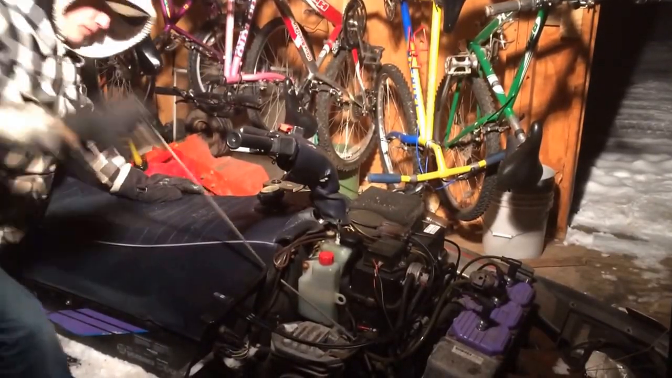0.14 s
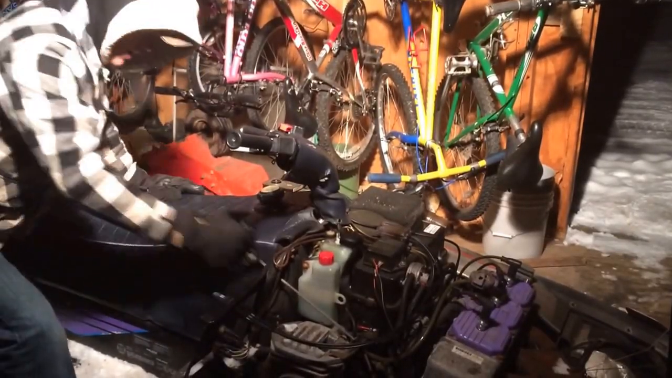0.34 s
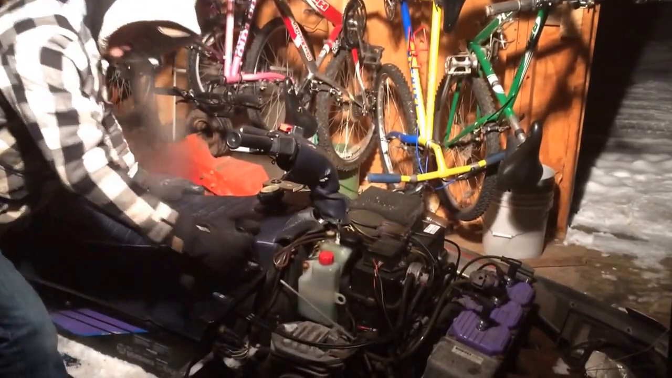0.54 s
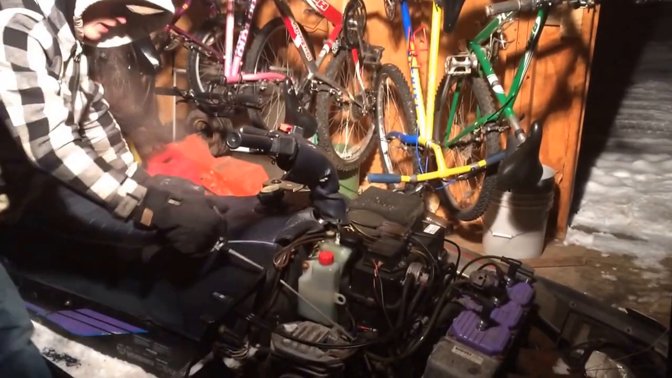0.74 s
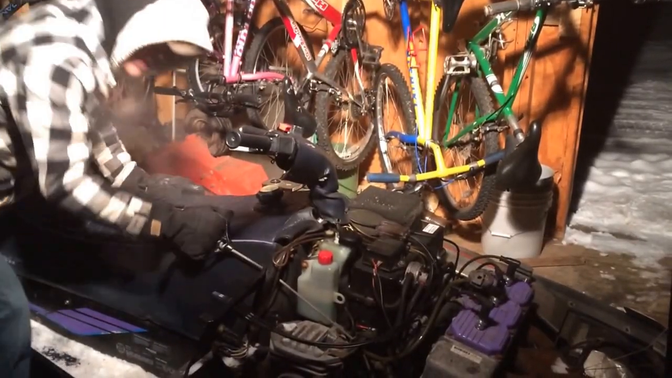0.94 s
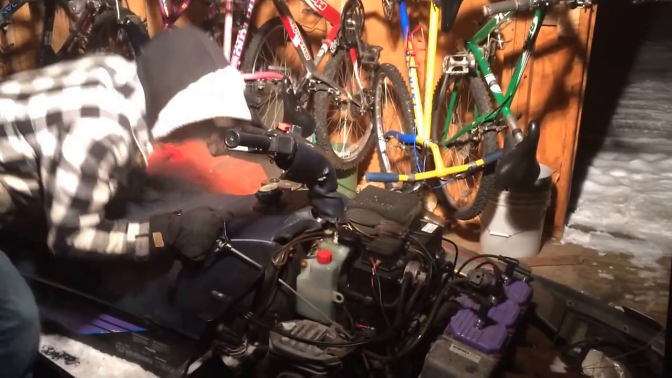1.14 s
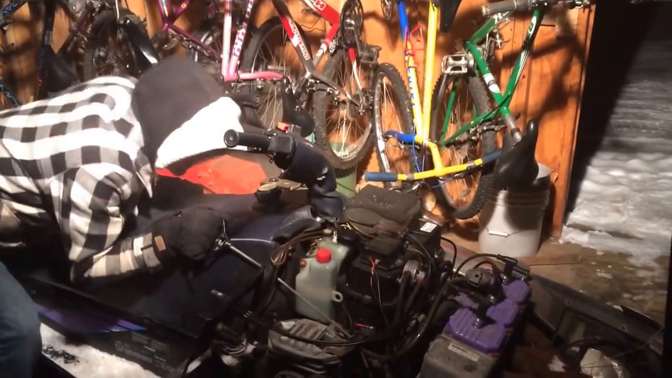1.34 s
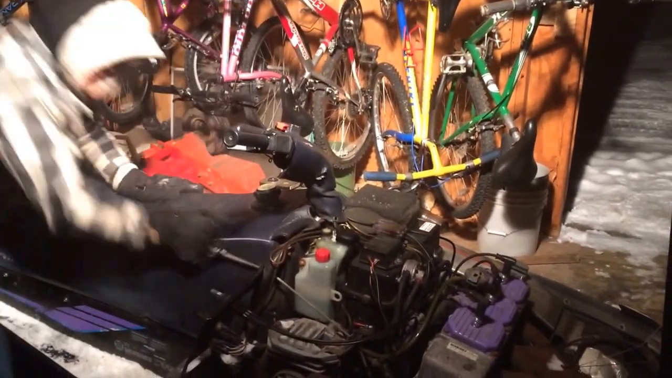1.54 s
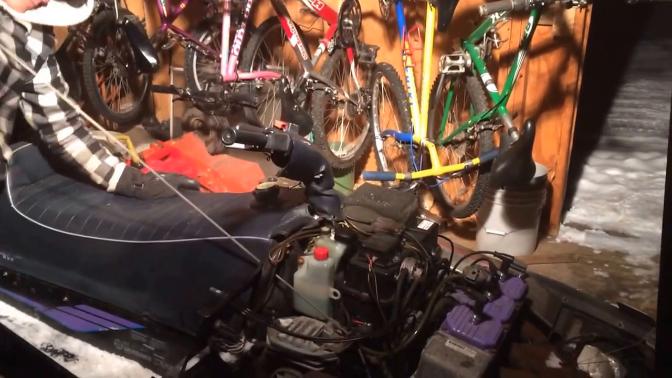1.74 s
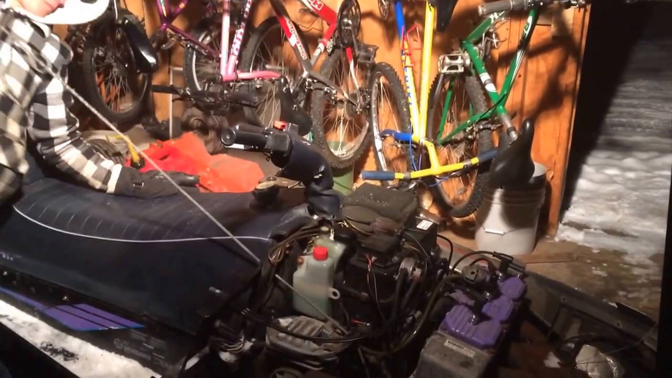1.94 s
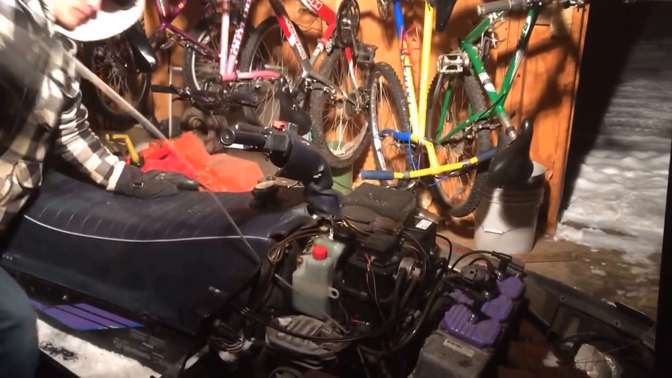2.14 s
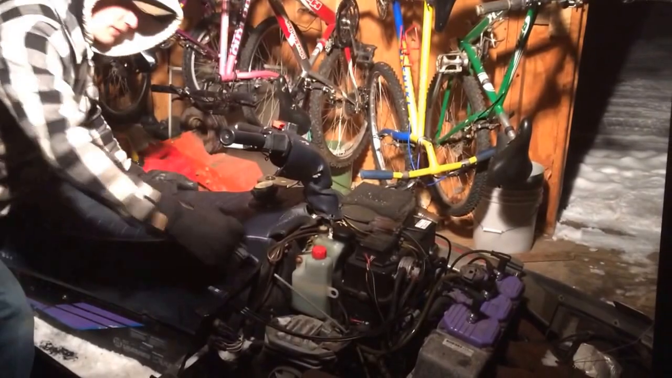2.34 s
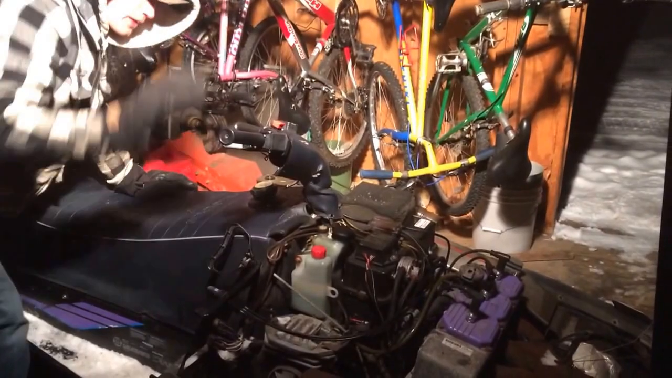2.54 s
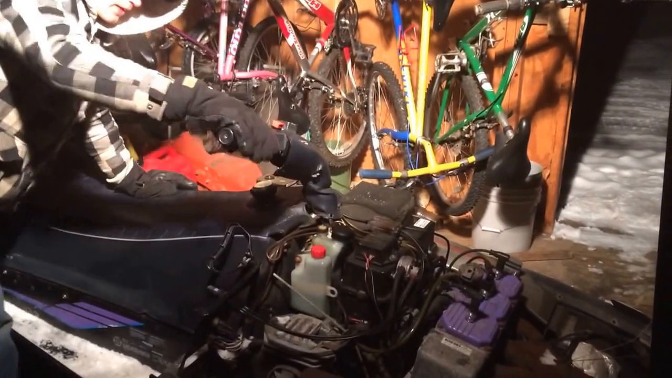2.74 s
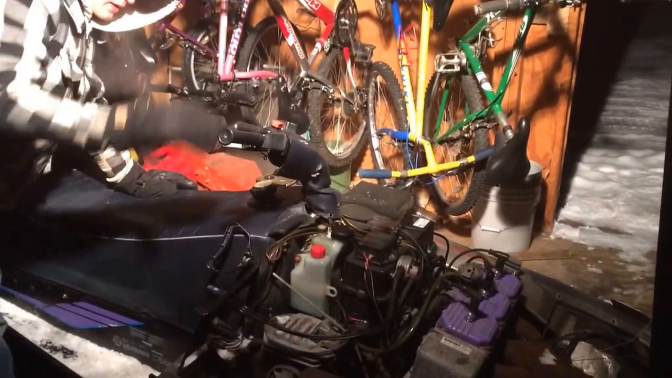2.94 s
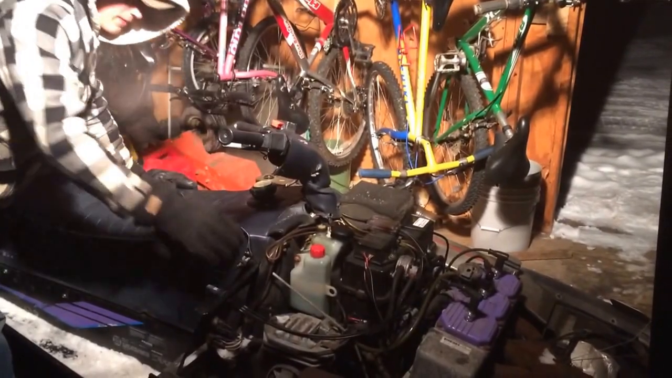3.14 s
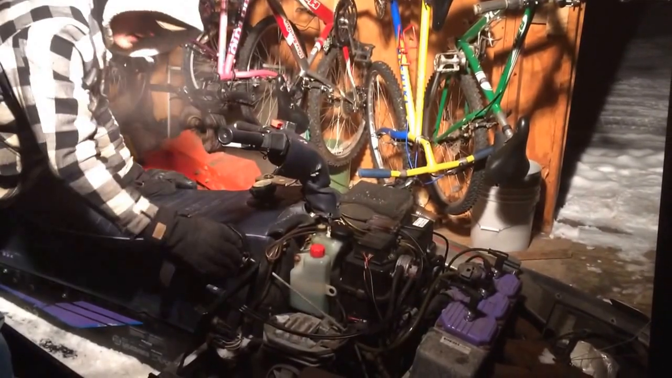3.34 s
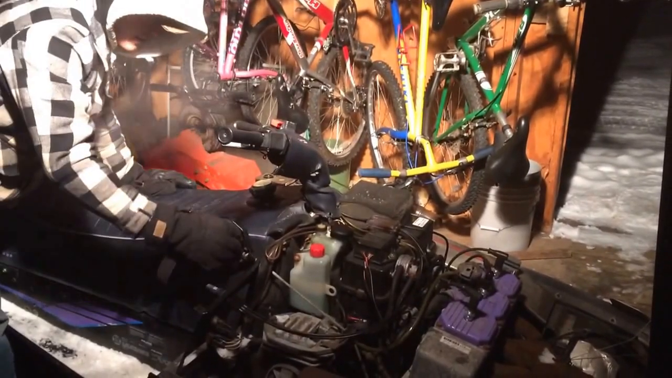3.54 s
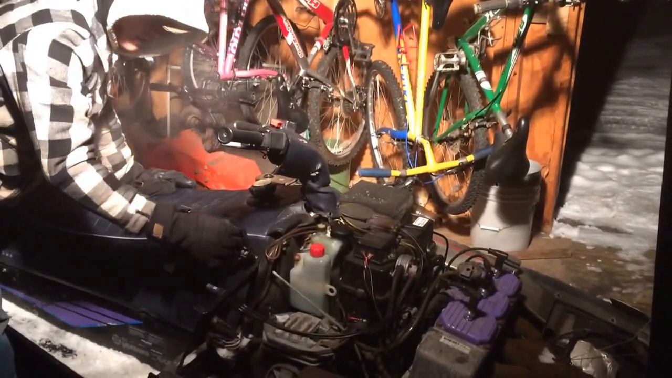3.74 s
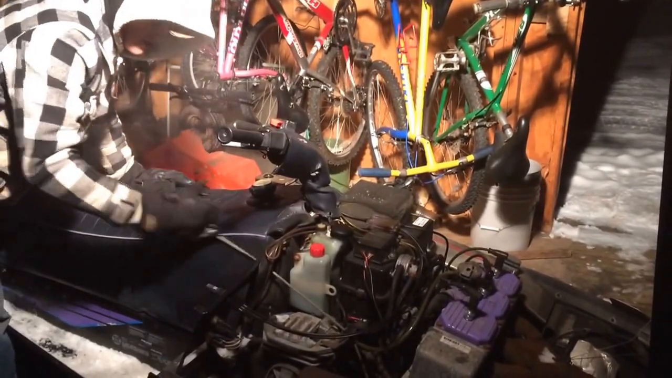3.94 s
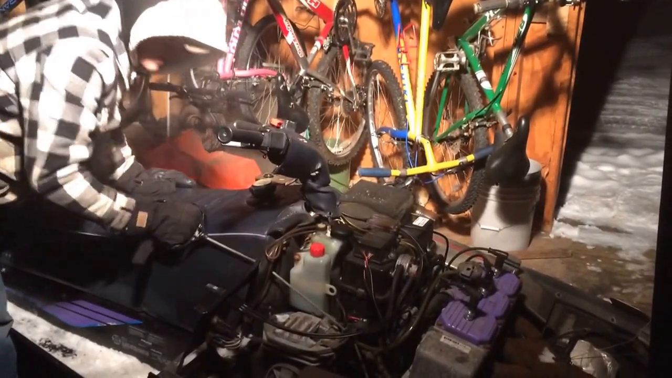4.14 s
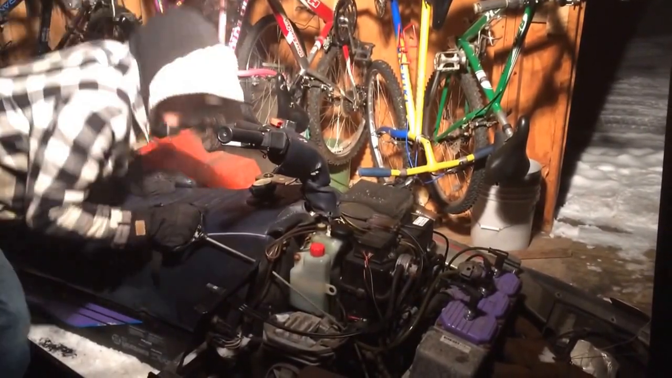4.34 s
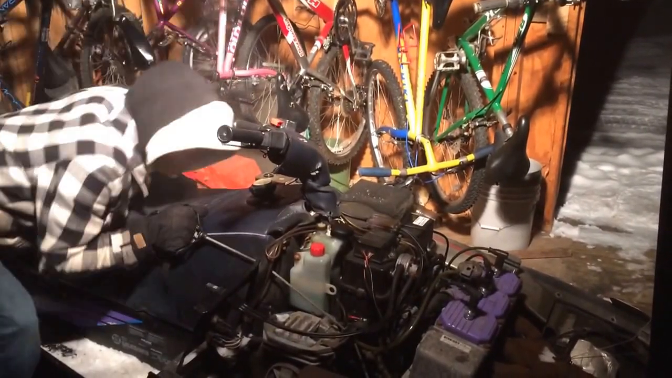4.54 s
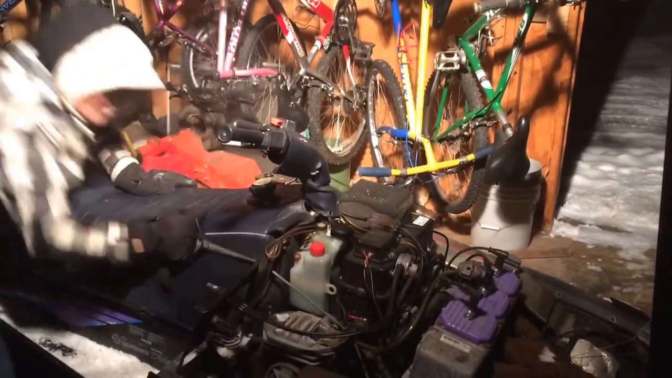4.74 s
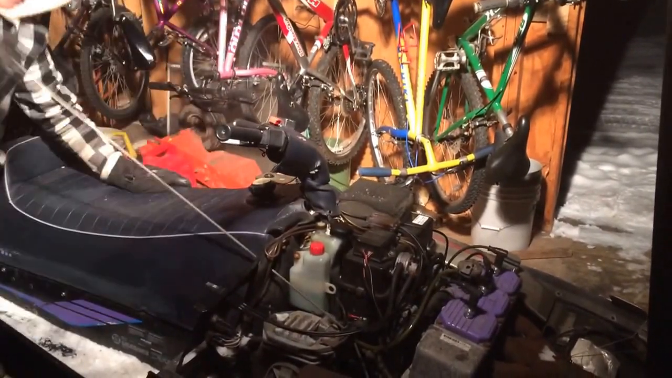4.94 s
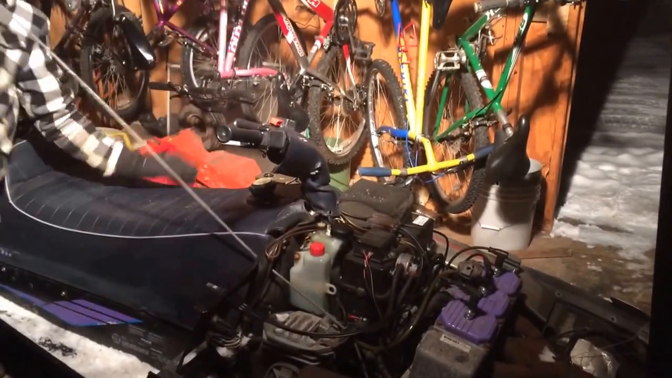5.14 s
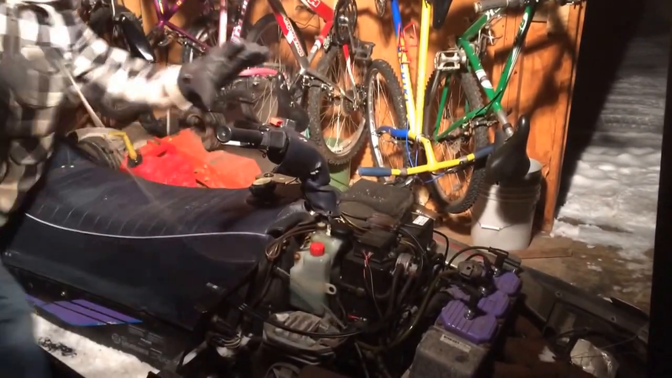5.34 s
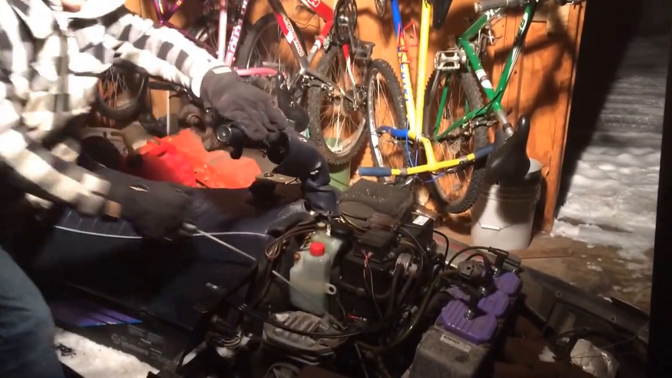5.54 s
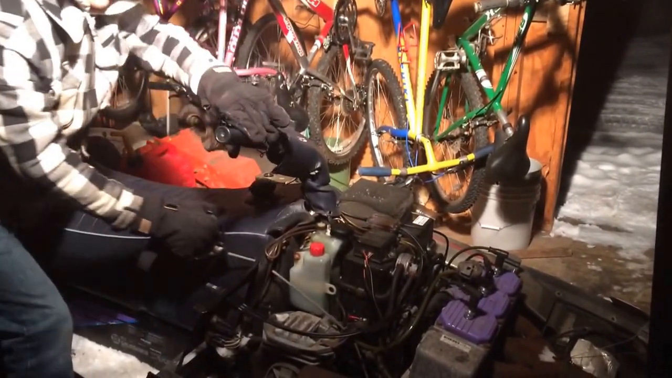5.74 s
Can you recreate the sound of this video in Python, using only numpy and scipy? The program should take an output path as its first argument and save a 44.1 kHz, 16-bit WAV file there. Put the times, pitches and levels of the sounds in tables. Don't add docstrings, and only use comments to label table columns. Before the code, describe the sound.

A two-stroke snowmobile is pull-started in a small wooden shed, heard close up with loud peaks slightly squashed. From 0 to 0.5 s a previous pull fades in weak puffs, rattling and dull knocks. At 0.65 s the handle hits the cowl hard, with a hollow bonk and thin steel ring; quiet handling and soft bumps follow. A cord scrape swells from 1.4 s, and from 1.6 to 2.3 s the engine coughs in low, uneven booms amid chattering panels, cowl hum, hiss, tiny squeaks and a pawl clink at 1.92 s. It wheezes out by 2.65 s. Boots and chassis thud around 2.8 s, then near quiet with small clicks and rustles. Handle clacks come at 3.9 and 4.0 s, with a pause and rising cord rub. A sharp knock at 4.78 s starts the last pull; irregular exhaust puffs and metallic clatter continue from 4.85 s, with a brief sag near 5.3 s, to the end.

```python
import sys
import numpy as np
from scipy import signal
from scipy.fft import rfft, irfft, next_fast_len
from scipy.io import wavfile
from scipy.ndimage import map_coordinates

SR = 44100
rng = np.random.default_rng(int(sys.argv[2]) if len(sys.argv) > 2 else 0)


def attenuation_scalar(level_db):
    decades = np.asarray(level_db, float) / 20
    return 10 ** decades


def master(y):
    cut = np.clip(np.atleast_2d(y).T, -1, 1)
    pcm = np.round(cut * 32767)
    wavfile.write(sys.argv[1], SR, pcm.astype(np.int16))


N = 255339
TIME = np.arange(N) / SR


def unit(x):
    return x / np.sqrt(np.mean(x ** 2))


def colour(x, spectrum):
    hz, db = np.transpose(spectrum)
    size = next_fast_len(len(x))
    f = np.arange(1, size // 2 + 2) * SR / size
    gain = attenuation_scalar(np.interp(np.log(f), np.log(hz), db, -70, -70))
    return unit(irfft(rfft(x, size) * gain, size)[:len(x)])


def ring(x, hz, t60):
    r = 1000 ** (-1 / (t60 * SR))
    w = 2 * np.pi * hz / SR
    return signal.lfilter([0, np.sin(w)], [1, -2 * r * np.cos(w), r * r], x)


def band(x, hz, width):
    edges = [max(hz - width / 2, 20), min(hz + width / 2, .45 * SR)]
    return signal.sosfilt(signal.butter(2, edges, "bandpass", fs=SR, output="sos"), x)


def walk(rate):
    low_pass = signal.butter(2, rate / 2, fs=SR, output="sos")
    return unit(signal.sosfilt(low_pass, rng.standard_normal(N)))


def grit(spread_db):
    sizes_db = spread_db * np.repeat(rng.exponential(size=N // 48 + 1), 48)[:N]
    return rng.standard_normal(N) * attenuation_scalar(np.minimum(sizes_db, 3.5 * spread_db))


def add(out, s, sound):
    i = int(s * SR)
    sound = sound[max(-i, 0):N - i]
    out[max(i, 0):max(i, 0) + len(sound)] += sound


def curve(rows, lag=0, quiet_db=-99):
    s, db = np.transpose(rows)
    return np.interp(TIME - lag, s, db, quiet_db if s[0] > .05 else db[0], quiet_db)


def boom(peak_s, db, hz, length):
    rise = 2 * length
    t = np.arange(int(8 * length * SR)) / SR / rise
    swell = attenuation_scalar(db) * (t * np.exp(1 - t)) ** 4
    return peak_s - rise, swell, -swell * np.cos(2 * np.pi * hz * rise * (t - 1))


# peak in seconds, peak level in dB, boom pitch in Hz.
COUGHS = [(0.0277, -29.9, 83.0), (0.0528, -34.8, 72.6), (0.105, -31, 83.0), (1.617, -18, 71.4),
          (1.632, -21, 106), (1.6572, -10.3, 71.4), (1.685, -17, 88), (1.703, -16, 118),
          (1.7197, -9.5, 71.5), (1.7486, -10, 68.0), (1.7668, -9.5, 99), (1.7935, -18, 68.0),
          (1.8187, -20, 121), (1.8401, -14.5, 107), (1.861, -3, 82.5), (1.8785, -14, 100),
          (1.8995, -7.5, 77.0), (1.9168, -29, 104.0), (1.9457, -9, 92.5), (1.9608, -18, 125),
          (1.9813, -23, 89.0), (2.0035, -4, 80.0), (2.02, -12, 110.0), (2.0436, -8, 77.0),
          (2.0662, -16, 98.0), (2.0959, -28, 89.0), (2.12, -11.5, 77.0), (2.1344, -24, 122.0),
          (2.1693, -23, 122.0), (2.1904, -17.5, 92.0), (2.2126, -10, 80.5), (2.2392, -11, 77.0),
          (2.277, -10.1, 85), (2.2955, -20, 119), (2.3262, -13, 82.5), (2.344, -25, 115), (2.3718, -19, 78),
          (2.427, -21.5, 77), (2.4845, -23.5, 81.4)]
# peak in seconds, peak level in dB, boom pitch in Hz.
PUFFS = [(4.852, -20, 77.0), (4.8676, -24, 116.0), (4.889, -13.5, 71.0), (4.9109, -21, 113.0),
         (4.9304, -16.5, 77.0), (4.955, -9.5, 99.6), (4.9714, -8, 83), (5.007, -22, 77.0), (5.0306, -5, 84),
         (5.047, -11, 101.0), (5.0685, -6, 77.0), (5.0951, -7, 77.0), (5.1115, -27, 122.0),
         (5.1355, -14.5, 86.0), (5.153, -23, 80.0), (5.171, -13, 84.5), (5.207, -27, 97),
         (5.2276, -2.5, 83), (5.2545, -5, 89), (5.344, -25, 71.0), (5.3853, -21, 71.6), (5.415, -26, 113.0),
         (5.4386, -17.5, 93), (5.46, -7.5, 65.0), (5.4835, -3.5, 81), (5.511, -16.5, 117),
         (5.5325, -14.5, 84), (5.5582, -3.5, 77.0), (5.5809, -12, 93.5), (5.6144, -12.5, 77.0),
         (5.6352, -18, 127), (5.652, -8, 78), (5.689, -10, 77.0), (5.7127, -21, 113.0), (5.7324, -18, 66.6),
         (5.751, -13, 86.0)]
# peak in seconds, peak level in dB,
# boom pitch in Hz.
WHEEZES = [(2.4, -20.5, 86), (2.455, -27, 90), (2.52, -29, 80), (2.556, -26.5, 80), (2.594, -32.5, 80.5),
           (2.625, -36, 80), (5.283, -23, 90), (5.315, -25, 100)]
# pitch in Hz, level in dB, T60 in seconds.
SILENCER = [(77, -18, 0.37), (140, 8.5, 0.14)]


def exhaust():
    pressure, flow, kicks = np.zeros(N), np.zeros(N), np.zeros(N)
    for s, db, hz in COUGHS + PUFFS + WHEEZES:
        start, swell, wave = boom(s, db, hz, length=.011)
        add(pressure, start, wave)
        add(flow, start, swell)
        add(kicks, s - .008, attenuation_scalar(db - 20) * np.hanning(130) / 65)
    shell = band(sum(attenuation_scalar(db) * ring(kicks, hz, t60) for hz, db, t60 in SILENCER), 144, 250)
    gas = attenuation_scalar(-24) * flow * unit(band(rng.standard_normal(N), 178, 104))
    return pressure + shell + gas


# time in seconds, level in dB.
SPINS = [
    [(0, -31.5), (.06, -33), (.16, -34.5), (.31, -42.5), (.45, -42)],
    [(1.57, -58), (1.63, -30), (1.71, -31), (1.8, -31.5), (2.1, -32.5), (2.24, -34), (2.42, -38.5),
     (2.7, -40), (2.85, -48)],
    [(4.72, -57), (4.79, -32.5), (4.89, -31), (4.95, -30.5), (5.11, -33), (5.27, -33), (5.47, -32.5),
     (5.9, -35)],
]
# time in seconds, fumbling in dB, weight leaning on the chassis in dB.
HANDLING = [(.2, -43, -24), (.43, -45, 4.5), (.61, -47.5, -5.5), (.72, -47.5, -0.5), (.82, -38, -3.5),
            (1.0, -48.5, -9.5), (1.12, -63, 2.5), (1.45, -71, 7), (2.3, -70.5, -16.5), (2.67, -39, -9),
            (2.82, -40, 0.5), (3.02, -66.5, -4.5), (3.3, -60, 4), (3.52, -48.5, -7.5), (3.87, -51.5, -7),
            (4.03, -54, 8), (4.24, -58, 3), (4.5, -61, 7.5), (4.701, -62.5, -1)]


def drive(db, slope, lag, hand_db, weight=0):
    spin_db = np.max([curve(pull, lag) for pull in SPINS], axis=0)
    hands_db = curve([(s, fumble_db + weight * lean_db) for s, fumble_db, lean_db in HANDLING])
    usual_spin_db = -33
    crank = attenuation_scalar(usual_spin_db + db + slope * (spin_db - usual_spin_db))
    return np.hypot(crank, attenuation_scalar(hands_db + hand_db))


# pitch in Hz, level in dB, T60 in seconds.
PANELS = [(340, -7.5, 0.25), (917, -8, 0.11), (1032, -4.5, 0.071), (1386, -8, 0.089), (1481, -3.5, 0.15),
          (1715, -6, 0.12), (1835, -5, 0.17), (1984, -11.5, 0.22), (3190, -14.5, 0.03)]
# frequency in Hz, level in dB.
RATTLE = [(400, -27), (600, -24), (1030, 3.5), (1850, 1), (2300, -7), (3190, -4), (3900, -18), (5500, -41)]


def rattle(jolt):
    ticks = grit(5.0)
    panels = sum(attenuation_scalar(db + 3.6 * walk(32.0)) * unit(ring(ticks, hz, t60)) for hz, db, t60 in PANELS)
    drift = np.cumsum(.025 * walk(8))
    panels = map_coordinates(panels, [np.arange(N) + drift], mode="mirror")
    chatter = .8 * colour(grit(3.4), RATTLE) + .7 * unit(panels)
    return chatter * attenuation_scalar(1.6 * jolt) * drive(db=0, slope=1.29, lag=0, hand_db=0) * attenuation_scalar(2.5)


# time in seconds, level in dB.
SLAPS = [
    (0.648, -13),
    (3.893, -21.5),
    (3.988, -17.5),
    (4.778, -15),
]


def cowl_buzz(jolt):
    tone = unit(ring(grit(4.0), 738, .11)) * attenuation_scalar(.8 * jolt + 1.4 * walk(14))
    fade_s = 0.046
    buzz = sum(attenuation_scalar(db - 6) * (TIME > s) * np.exp(-np.abs(TIME - s) / fade_s) for s, db in SLAPS)
    return tone * (drive(db=-5, slope=1.1, lag=0, hand_db=-19.5) + buzz)


# frequency in Hz, level in dB.
HISS = [(1800, -42.5), (2600, -5), (5200, -1), (8000, -2.5), (10000, -10), (14000, -11.5), (16000, -17.5)]


def hiss(jolt):
    air = colour(grit(1.8), HISS) * attenuation_scalar(.6 * jolt + .9 * walk(60))
    return air * drive(db=-8, slope=2.2, lag=.05, hand_db=-7)


# frequency in Hz, level in dB.
RUMBLE = [(40, -14), (80, -13), (130, -0.5), (170, -1.5), (230, -1), (340, -1), (450, -3.5), (600, -4),
          (800, -9)]


def rumble(jolt):
    shake = colour(rng.standard_normal(N), RUMBLE) * attenuation_scalar(1.2 * jolt + 1.5 * walk(40))
    return shake * drive(db=-8.5, slope=1.7, lag=-0.0166, hand_db=-0.5, weight=0.94) * attenuation_scalar(5.5)


def machine():
    jolt = walk(60)
    return rattle(jolt) + cowl_buzz(jolt) + hiss(jolt) + rumble(jolt)


# peak in seconds, peak
# level in dB.
HUMS = [(1.61, -27), (1.679, -17), (1.721, -21.5), (1.755, -33), (1.774, -19.5), (1.815, -21.5),
        (1.833, -24), (1.857, -20), (1.895, -20.5), (1.957, -36), (2.009, -36), (2.038, -34), (2.133, -25),
        (2.184, -24.5), (2.204, -31), (2.241, -24.5), (2.28, -25.5), (2.302, -29), (2.354, -31),
        (2.397, -31.5), (2.49, -36), (2.52, -32), (2.549, -33), (2.613, -42), (4.05, -27), (4.088, -32),
        (4.857, -26), (4.905, -26), (4.932, -22), (4.979, -17), (5.037, -24.5), (5.061, -24.5), (5.08, -30),
        (5.176, -34), (5.28, -28), (5.347, -24.5), (5.414, -21.5), (5.437, -24), (5.467, -22),
        (5.546, -17.5), (5.565, -32), (5.584, -25.5), (5.66, -35), (5.753, -26), (5.785, -27)]


def cowl_hum():
    rise_s, fade_s = 0.0044, 0.018
    power = np.zeros(N)
    for s, db in HUMS:
        rise = np.exp(-((TIME - s) / rise_s) ** 2)
        fade = np.exp(-2 * np.abs(TIME - s) / fade_s)
        power += attenuation_scalar(2 * db) * np.where(TIME < s, rise, fade)
    return np.sqrt(power) * np.sin(2 * np.pi * np.cumsum(740 + 22 * walk(50)) / SR)


# start in seconds, crack in dB, cowl knock in dB, thump in dB.
KNOCKS = [(.062, -40, -18.5, -40), (.175, -45, -18, -46), (.187, -43, -18.5, -45), (.245, -50, -24.5, -50),
          (.288, -50, -31, -50), (.3955, -22.5, -47, -12), (.411, -45, -48, -21),
          (.5313, -22.5, -31, -22.5), (.6128, -18.5, -34, -22.5), (.6451, -6.5, 1, -1.5),
          (.7537, -29, -24, -40), (1.586, -31, -36, -39), (1.6437, -8, -17, -6), (2.7826, -20, -41, -14),
          (2.798, -36, -43, -27), (2.812, -32, -47, -18), (3.3047, -31, -49, -39), (3.3323, -34, -68, -24),
          (3.4111, -28, -65, -28), (3.8688, -17.5, -32, -26), (3.8912, -10, -36, -10),
          (3.9519, -15, -32, -24.5), (3.9859, -2.5, -8, 0), (4.0014, -41, -5.5, -6.5),
          (4.0774, -45, -30, -50), (4.2, -33.5, -66, -32), (4.7772, -9.5, -1.5, -10),
          (4.7934, -15, -9.5, -4.5), (5.0986, -3, -26, -11.5), (5.3837, -10.5, -23, -8),
          (1.9185, -4.5, -47, -32)]
# start in seconds, crack in dB, thump in dB, crack colour in Hz, fade in seconds.
CLICKS = [(0.052, -22, -23, 8000, 0.011), (0.1516, -20.5, -19, 8400, 0.017), (.7625, -27, -50, 10000, .003),
          (1.4165, -43.5, -61, 4430, 0.0039), (2.128, -24.5, -37, 9000, 0.0065),
          (3.011, -54, -47.5, 6540, .003), (3.108, -42, -69.5, 9000, 0.0033),
          (3.4045, -28, -60, 7950, .002), (3.58, -44, -26, 7000, 0.0091), (5.4625, -17, -40, 8000, .0025),
          (5.555, -19.5, -39, 8800, 0.0088), (0.373, -30, -50, 9000, 0.0054),
          (0.981, -33.5, -28, 7760, 0.0032), (1.1756, -40, -47.5, 4250, 0.03),
          (1.6428, -6.5, -35, 6200, 0.0067), (1.8422, -7.5, -13.5, 7200, 0.0069),
          (1.916, -14, -17.5, 6560, 0.018), (2.0387, -20, -37, 4960, 0.0025),
          (2.193, -20.5, -34, 7400, 0.029), (2.4554, -4.5, -12.5, 6600, 0.0031),
          (2.6227, -16.5, -27, 5850, 0.0042), (2.9788, -35.5, -43.5, 4330, 0.0054),
          (4.9547, -9, -36, 6100, 0.0091), (5.2078, -14.5, -19, 8100, 0.011),
          (5.3368, -23.5, -28, 3190, 0.041), (5.41, -22, -42, 9000, .005), (5.441, -14, -30, 7640, 0.004),
          (5.476, -14.5, -18, 6300, 0.013), (5.5392, -20, -17.5, 3330, 0.02), (.646, -12, -20, 6300, 0.008),
          (3.987, -14, -20, 6100, 0.008), (4.7765, -11.5, -10, 5340, 0.0082)]
# pitch in Hz, level in dB, T60 in seconds.
COWL = [(740, 0, .075), (700, -15, .04), (790, -15, .04), (334, -12, .1), (250, -16, .07), (480, -15, .04),
        (985, -9, .08), (1712, -14, .1), (3170, -22, .05), (1400, -16, .08)]


def hits():
    out, blows = np.zeros(N), np.zeros(N)
    t = np.arange(int(.2 * SR)) / SR
    rows = [(*row, 2950, 0.0056) for row in KNOCKS]
    rows += [(s, db, db - 35, thump_db, hz, fade) for s, db, thump_db, hz, fade in CLICKS]
    noise = rng.standard_normal((len(rows), 2, len(t)))
    bounces = np.convolve(np.tile(np.eye(60)[0], 4), np.hanning(18)) / 36
    for (s, crack_db, knock_db, thump_db, hz, fade), (a, b) in zip(rows, noise):
        fade = max(fade, .002)
        shape = np.minimum(t / 0.0029, 1) * (np.exp(-t / fade) + 0.41 * np.exp(-t / (2.7 * fade)))
        crack = .52 * unit(band(a, 6300, 7600))
        crack = crack + .7 * unit(band(a, 1.1 * hz, .8 * hz)) + .5 * unit(band(a, hz, .45 * hz))
        crack = band(crack, 6500, 11000)
        thump = unit(band(band(b, 1360, 1150), 1130, 1360))
        hollow = unit(band(b, 760, 760))
        add(out, s - .001, shape * (attenuation_scalar(crack_db - 14.5) * crack + attenuation_scalar(thump_db - 10.5) * thump))
        add(out, s, shape * attenuation_scalar(knock_db - 17.0) * hollow)
        add(blows, s, attenuation_scalar(knock_db - 0.5) * bounces)
    return out + band(sum(attenuation_scalar(db) * ring(blows, hz, t60) for hz, db, t60 in COWL), 2410, 4450)


def clinks(strikes, modes, twin):
    out = np.zeros(N)
    t = np.arange(int(.6 * SR)) / SR
    read_s = .025

    def tone(hz, t60, off, turn):
        return 1000 ** ((read_s - t) / t60) * np.sin(2 * np.pi * (hz * (1 + off) * t + turn))

    for k, s in enumerate(strikes):
        for (hz, t60, *db), chance in zip(modes, rng.random((len(modes), 5))):
            pair = tone(hz, t60, 0, chance[0])
            pair = pair + twin * tone(hz, .8 * t60, .006 * chance[1] - .003, chance[0] + .2 * chance[2])
            pair = pair + .3 * tone(hz, .5 * t60, .03 * chance[3] - .015, chance[4])
            add(out, s, attenuation_scalar(db[k]) * np.minimum(t / .003, 1) * pair / np.hypot(1, twin))
    return out * attenuation_scalar(1.5 * walk(150))


PAWL_HITS = [
    1.92,
    5.1,
]
# pitch in Hz, T60 in seconds, level in dB at each blow.
PAWL = [(2037, .25, -29, -31), (3951, .3, -40, -48), (5165, .72, -31, -33), (5236, .66, -28, -30),
        (6449, .36, -26, -45), (8050, .26, -32, -36), (8200, .26, -31, -35), (8400, .22, -36, -38),
        (9520, .8, -35, -38), (10650, .19, -40, -39), (11200, .19, -33, -31), (11820, .18, -28, -34),
        (14000, .24, -41, -36), (14840, .25, -40, -48)]


def pawl():
    return clinks(PAWL_HITS, PAWL, twin=.35)


HANDLE_HITS = [
    .646,
    3.894,
    3.987,
]
# pitch in Hz, T60 in seconds, level in dB at each blow.
HANDLE = [(4760, .2, -57, -58, -47), (6455, .33, -46, -60, -45), (6620, .25, -56, -44, -52),
          (8027, .13, -42, -54, -39), (8215, .1, -42, -54, -35), (9582, .22, -41, -43, -48),
          (10610, .22, -48, -55, -46), (11290, .2, -48, -49, -48), (11600, .2, -48, -48, -49),
          (11950, .2, -45, -50, -46), (14200, .18, -51, -50, -54), (15000, .15, -58, -56, -62)]


def handle():
    return clinks(HANDLE_HITS, HANDLE, twin=1.0)


# start in seconds, level
# in dB, pitch in Hz, width in Hz, fade in seconds.
SQUEAKS = [(1.678, -19, 13100, 400, .01), (1.69, -34, 13150, 200, .035), (1.757, -29, 13100, 700, .02),
           (1.774, -30, 11750, 180, .03), (1.872, -31, 11950, 200, .03), (4.902, -29, 13200, 500, .017),
           (4.972, -33, 11860, 150, .055), (5.045, -36, 11860, 150, .03), (4.79, -34, 8100, 300, .013),
           (.615, -37, 8400, 500, .008), (4.957, -27, 5150, 350, .008), (1.918, -22, 3100, 400, .006),
           (5.11, -29, 4040, 350, .025)]
# start in seconds, peak level in dB.
TICKS = [(.646, -15.5), (1.644, -37), (1.844, -26), (1.922, -15), (2.197, -31), (3.891, -22.5),
         (3.987, -15), (4.777, -22.5), (4.955, -19), (5.102, -20), (5.211, -31), (5.34, -29.5),
         (5.464, -35), (5.475, -18), (5.555, -27)]
# start in seconds, peak level in dB, pitch in Hz.
TAPS = [(1.66, -20, 1630), (1.7904, -28, 1900), (1.8253, -21, 1010), (2.0553, -33, 1720),
        (2.079, -25, 1490), (2.15, -17, 1540), (2.203, -20, 1370), (2.549, -28, 1830), (2.64, -26, 1760),
        (4.778, -8.5, 1670), (4.8798, -22, 1560), (4.9046, -23, 985), (4.961, -17, 1670),
        (5.3581, -23, 1560), (5.385, -22, 3140), (5.386, -21, 1050), (5.5409, -15.5, 1690),
        (5.61, -24, 1630), (5.78, -17, 1650)]


def squeaks():
    out = np.zeros(N)
    t = np.arange(int(.15 * SR)) / SR
    rows = SQUEAKS + [(s, db, 12700, 4200, .006) for s, db in TICKS]
    rows = rows + [(*tap, 146, .007) for tap in TAPS]
    for (s, db, hz, width, fade), noise in zip(rows, rng.standard_normal((len(rows), len(t)))):
        shape = np.minimum(t / 0.0022, 1) * np.exp(-t / fade)
        add(out, s, attenuation_scalar(db) * shape * unit(band(noise, hz, width)))
    return out


# peak in seconds, peak level in dB, pitch in Hz.
THUDS = [(0.079, -22.5, 340), (.3, -44, 50.5), (0.406, -24, 427), (.427, -29.5, 272), (.447, -29, 466),
         (.85, -29, 109), (0.944, -29, 118), (0.967, -35, 112), (.993, -30, 106), (1.181, -36, 151),
         (1.2, -30, 175), (1.225, -28.5, 101), (1.242, -33, 185), (1.261, -39, 86.4), (1.279, -44, 252),
         (1.295, -41, 525), (1.309, -36.5, 92), (1.325, -38, 167), (2.73, -37.5, 72), (2.782, -28.5, 430),
         (2.824, -28, 243), (2.843, -25.5, 237), (2.86, -22, 140), (2.878, -18.5, 140), (2.969, -35.5, 92),
         (3.31, -32, 418), (3.91, -31.5, 338), (4.001, -20.5, 340), (4.127, -33, 340), (4.207, -37.5, 326),
         (4.518, -31, 140), (4.544, -34.5, 130), (4.575, -44, 110), (4.695, -35, 132), (4.83, -17, 156)]


def thuds():
    out = np.zeros(N)
    for s, db, hz in THUDS:
        start, _, wave = boom(s, db, hz, length=0.0096 * (130 / hz) ** .75)
        add(out, start, wave)
    return out * attenuation_scalar(3 * walk(160))


# start and end in seconds, level in dB, low-pass in Hz, swell in seconds.
RUBS = [(0.806, 0.896, -27, 10300, 0.016), (1.17, 1.31, -53.5, 6040, 0.0085),
        (1.425, 1.579, -39.5, 12000, 0.1), (1.568, 1.697, -30, 13000, 0.026),
        (2.772, 2.828, -29.5, 4640, 0.002), (2.848, 3.02, -49.5, 5000, .01),
        (3.983, 4.046, -31.5, 3000, .005), (3.51, 3.636, -42, 5750, 0.034), (4.108, 4.13, -44, 6000, 0.014),
        (4.191, 4.512, -51, 9100, 0.0059), (4.594, 4.804, -38.5, 11000, 0.12),
        (4.763, 4.891, -33, 14000, 0.0057)]
# frequency in Hz, level in dB.
RUB = [(80, 12.5), (200, 1.5), (470, -1.5), (600, 3), (800, -2), (1720, -1.5), (2420, -6), (8800, -13),
       (14700, -21.5)]


def rubs():
    noise = colour(grit(1.5), RUB) * attenuation_scalar(.9 * walk(60))
    out = np.zeros(N)
    for start, end, db, top_hz, swell in RUBS:
        touch = np.clip(np.minimum((TIME - start) / swell, (end - TIME) / .05 + 1), 0, 1) ** 2
        out += attenuation_scalar(db) * touch * band(noise, top_hz / 2 + 150, top_hz)
    return out


def shed(x):
    t60 = .26
    t = np.arange(int(.4 * SR)) / SR
    noise = rng.standard_normal(len(t)) * np.minimum(t / 0.0065, 1)
    dull = band(band(noise, 2300, 2600), 2300, 2600)
    bright = band(noise, 8000, 9000)
    echoes = dull * 1000 ** (-t / t60) + 0.64 * bright * 1000 ** (-t / (0.8 * t60))
    return signal.fftconvolve(x, echoes / np.sqrt(np.sum(echoes ** 2)))[:N]


# frequency in Hz, level in dB.
FLOOR = [(25, -28.5), (50, -9.5), (88, 0), (210, -14.5), (600, -31.5), (1800, -34.5), (2500, -28.5),
         (7000, -29), (12000, -35), (16000, -39)]


def room_tone():
    return colour(rng.standard_normal(N), FLOOR) * attenuation_scalar(-54.5) * attenuation_scalar(1.5 * walk(8))


def scene():
    sharp = hits() + handle() + squeaks()
    engine = exhaust() + machine() + cowl_hum() + pawl()
    body = thuds() + rubs()
    return (engine + sharp + body + attenuation_scalar(-11) * shed(sharp) + room_tone())[None]


STARVED_HZ = [(12450, 13750), (14900, 16500)]
STARVED_S = [(.655, .75), (1.95, 2.0), (3.91, 3.98), (3.996, 4.12), (5.12, 5.205)]


def starve(x):
    f, t, z = signal.stft(x, SR, nperseg=512)
    busy = np.any([(t > a) & (t < b) for a, b in STARVED_S], axis=0)
    weak = np.any([(f > a) & (f < b) for a, b in STARVED_HZ], axis=0)
    z[np.outer(weak, busy)] *= attenuation_scalar(-35)
    return signal.istft(z, SR, nperseg=512)[1][:N]


def roll_off(x):
    return signal.sosfilt(signal.butter(12, 16300, fs=SR, output="sos"), x)


def record(dry):
    soft = starve(np.tanh(.8 * dry[0]) / .8)[None]
    top_cut = signal.ellip(10, .2, 80, 15150, fs=SR, output="sos")
    return roll_off(signal.sosfilt(top_cut, soft))


dry = scene()
out = record(dry)
master(out)
```